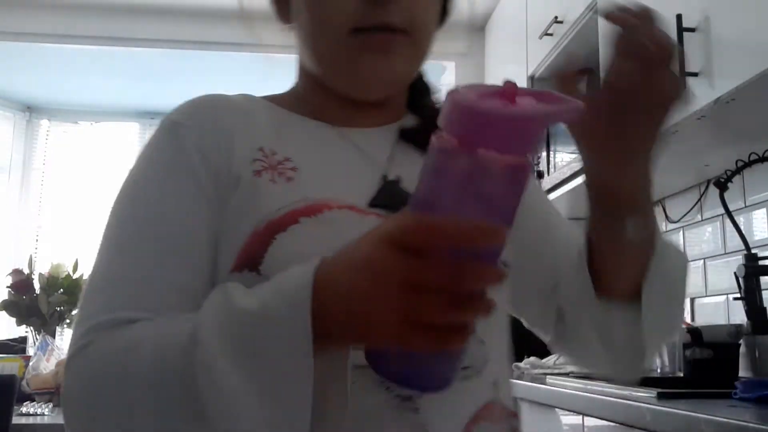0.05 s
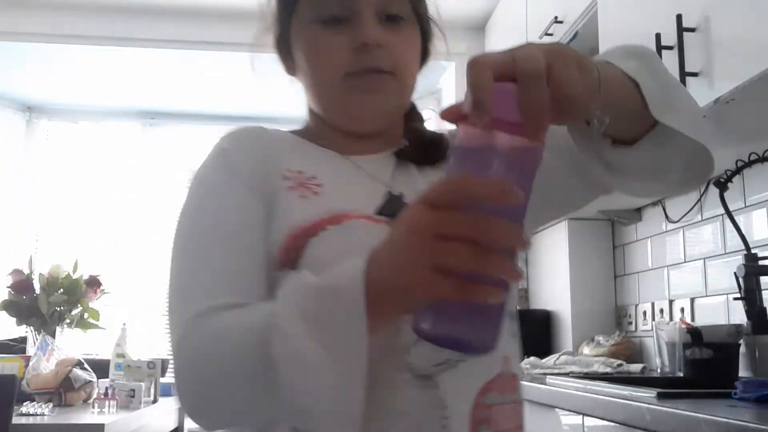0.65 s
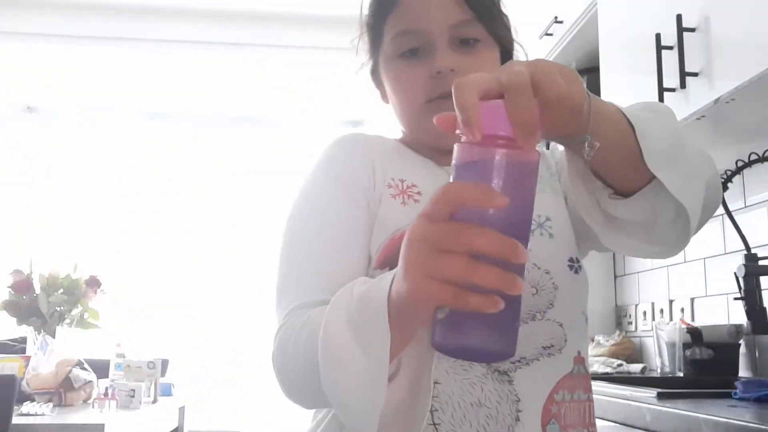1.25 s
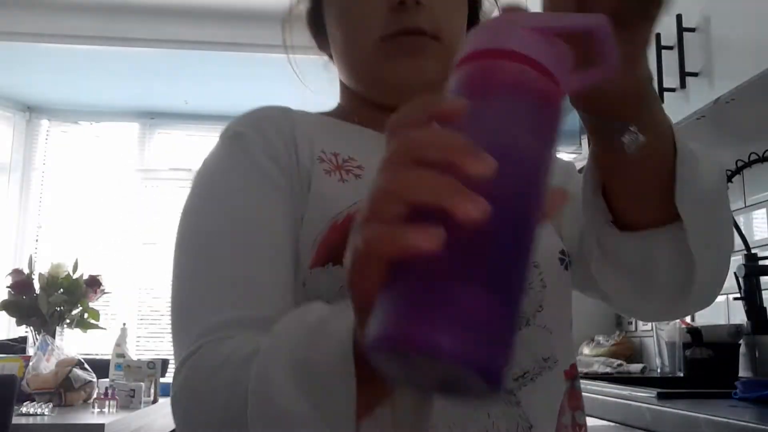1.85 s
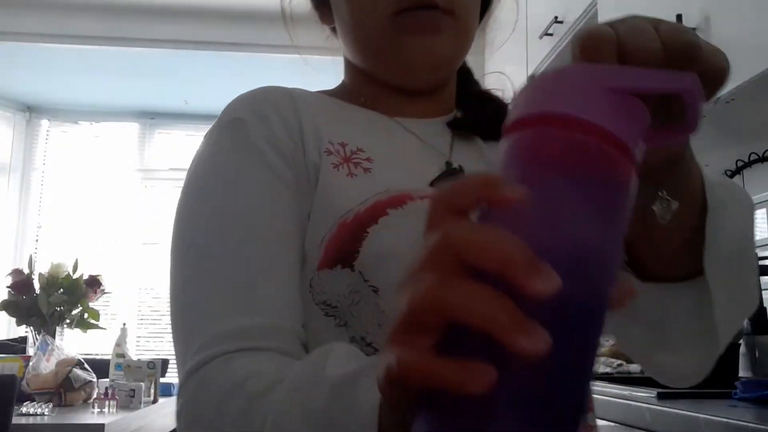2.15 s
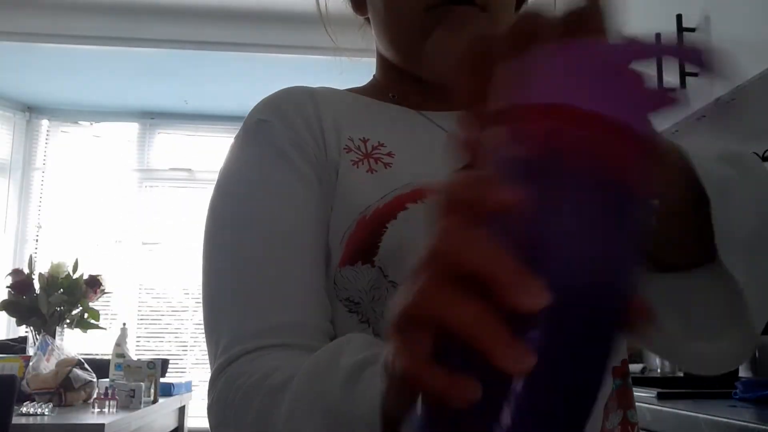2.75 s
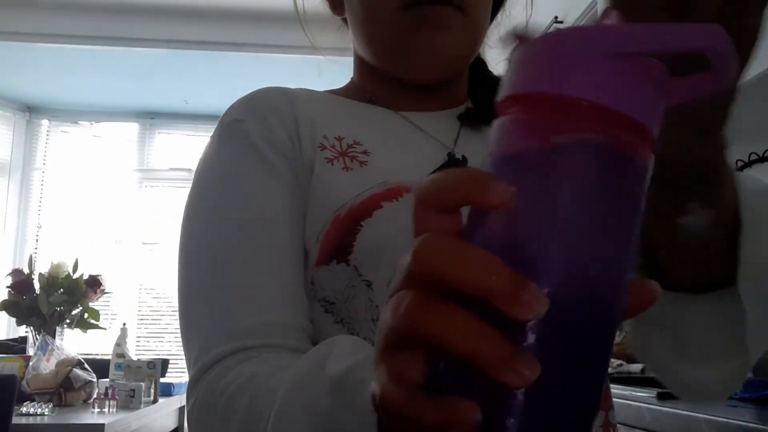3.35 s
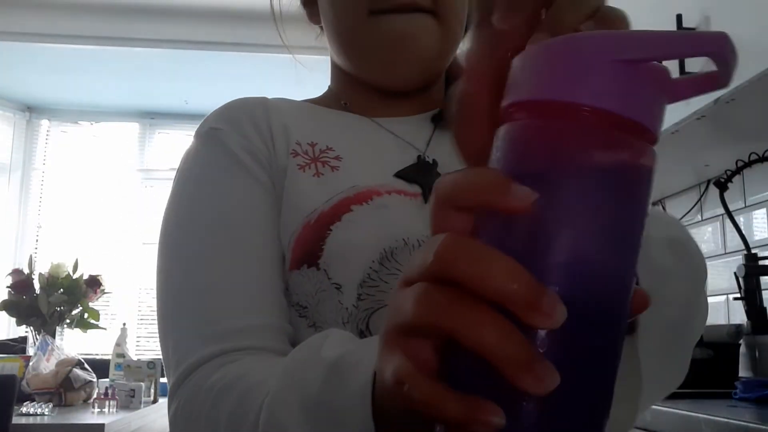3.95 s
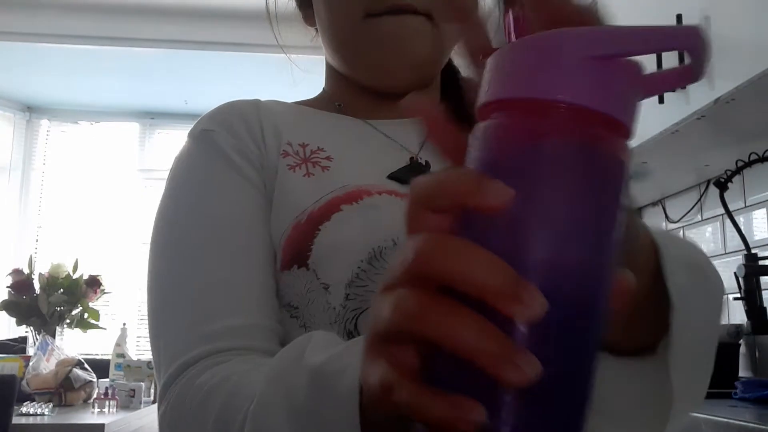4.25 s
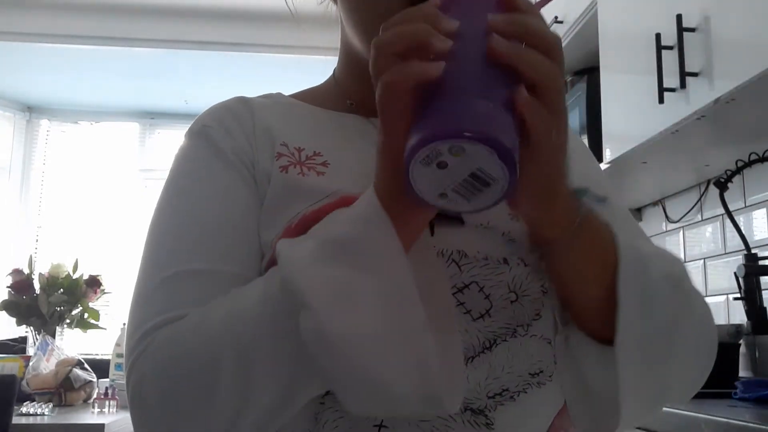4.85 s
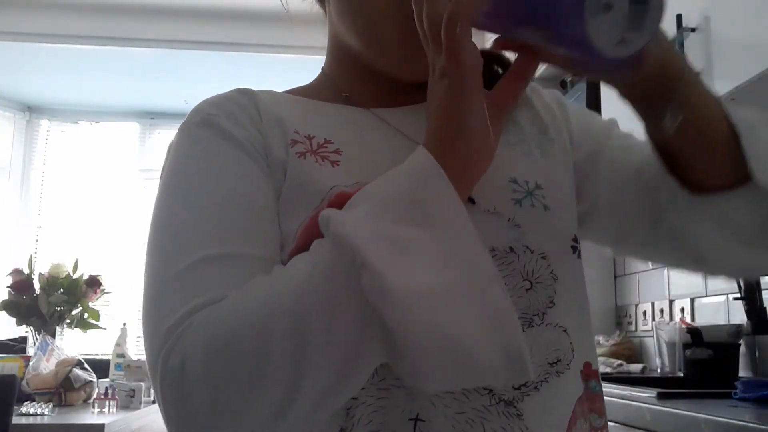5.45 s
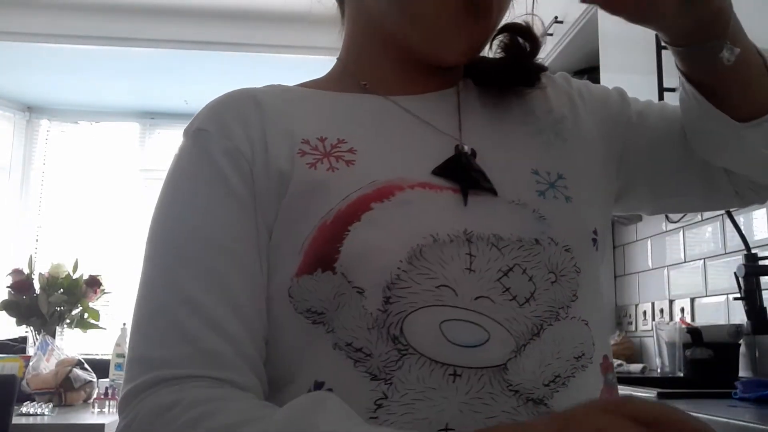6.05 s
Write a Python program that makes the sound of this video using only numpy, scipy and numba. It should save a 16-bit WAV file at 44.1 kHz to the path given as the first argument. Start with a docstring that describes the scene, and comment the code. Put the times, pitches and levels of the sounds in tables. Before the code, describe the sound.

In a quiet kitchen with a faint appliance hum, a plastic bottle is handled right by a small stereo microphone. Soft rubbing and scattered lid clicks lead to two loud, low thumps through the table, mixed with hollow knocks and clattering plastic. Then come small watery plips, a short snap of the flip straw and a soft slosh, before the handling dies away.

```python
"""A plastic water bottle with a flip straw, handled close to a small stereo microphone in a quiet kitchen.
Hands rub and the lid clicks, ringing the plastic; the hollow wall knocks and the spout snaps over.
The bottle bumps the table under the microphone, twice hard, and bubbles plip as the water is tipped.
An appliance hums behind it, tiled walls add a short tail, and the gain control ducks after big thumps."""
import sys
import numpy as np
from scipy import signal
from scipy.fft import rfft, irfft, next_fast_len
from scipy.io import wavfile
from scipy.ndimage import map_coordinates
from numba import njit

SR = 44100
rng = np.random.default_rng(int(sys.argv[2]) if len(sys.argv) > 2 else 0)


def pcm_store(signal):
    """Save signal as 16-bit PCM."""
    levels = np.round(np.clip(np.atleast_2d(signal), -1, 1) * 32767)
    wavfile.write(sys.argv[1], SR, levels.astype(np.int16).T)


N = 274294
TIME = np.arange(N) / SR
RING = np.arange(int(.7 * SR)) / SR  # seconds since the start of one event


def undb(db):
    """Decibels to gain."""
    return 10 ** (np.asarray(db) / 20)


def unit(x):
    """Scale to rms 1."""
    return x / np.sqrt(np.mean(x ** 2))


def fade(t60):
    """Exponential decay, 60 dB down after t60 seconds."""
    return np.exp(-np.log(1000) * RING / max(t60, 1e-3))


def add(out, s, sound):
    """Mix a sound in at s seconds."""
    i = max(int(s * SR), 0)
    out[..., i:i + sound.shape[-1]] += sound[..., :N - i]


def shaped(x, gain):
    """Filter by a gain that is a function of frequency."""
    size = next_fast_len(x.shape[-1])
    hz = np.maximum(np.arange(size // 2 + 1) * SR / size, 1)
    return irfft(rfft(x, size) * gain(hz), size)[..., :x.shape[-1]]


def resonate(x, peaks):
    """Parallel resonances, each applied twice for steep skirts."""
    out = 0
    for hz, width, db in peaks:
        b, a = signal.iirpeak(hz, hz / (1.5 * width), fs=SR)
        out = out + undb(db) * signal.lfilter(b, a, signal.lfilter(b, a, x))
    return out


def stereo_noise(size, spread=1):
    """Noise at the microphone's two ports: a shared part plus a part of their own."""
    return rng.standard_normal(size) + spread * rng.standard_normal((2, size))


def wander(rate_hz):
    """Random drift, spread near 1."""
    knots = rng.standard_normal(int(N / SR * rate_hz) + 2)
    return np.interp(TIME * rate_hz, np.arange(len(knots)), knots)


def struck(force, peaks):
    """Resonances rung by a force, rms 1 over the first 12 ms; grip and contact point shift them."""
    chance = rng.uniform(-1, 1, (len(peaks), 2))
    shifted = [(hz * (1 + .06 * detune), width, db + 2.5 * weight)
               for (hz, width, db), (detune, weight) in zip(peaks, chance)]
    ring = resonate(force, shifted)
    return ring / np.sqrt(np.mean(ring[:, :int(.012 * SR)] ** 2))


# An appliance in the background, centred. Each row: frequency in Hz, rms level in dB.
HUM_PARTIALS = [(49.2, -52), (98, -66.5), (147.4, -70), (196.5, -75.5), (294.8, -64), (393, -79)]


def appliance_hum():
    """A motor hums steadily on a few low partials."""
    return sum(np.sqrt(2) * undb(db) * np.sin(2 * np.pi * (hz * TIME + rng.random()))
               for hz, db in HUM_PARTIALS)


# Room tone all around the microphone. Each row: frequency in Hz, relative spectral density in dB.
AIR_SPECTRUM = [(25, -26.5), (60, -8), (120, 6.5), (250, -3), (450, -7), (700, -10), (1000, -19),
                (2000, -29), (4000, -35.5), (8000, -35), (11500, -33), (16000, -35.5)]


def room_tone(rms_db=-61.5, apart_hz=900):
    """Still air and microphone hiss, with the bass alike at both ports."""
    points_hz, db = np.transpose(AIR_SPECTRUM)
    colour = lambda hz: undb(np.interp(np.log(hz), np.log(points_hz), db))
    mid = shaped(rng.standard_normal(N), colour)
    side = shaped(rng.standard_normal(N), lambda hz: colour(hz) * hz / (hz + apart_hz))
    return undb(rms_db) * unit(np.array([mid + side, mid - side]))


# The bottle's resonances from close up: three ranges of the plastic, then the air and water inside.
# Each row: frequency in Hz, width in Hz, relative level in dB.
PLASTIC_BODY = [(660, 260, -4), (1200, 200, -8), (1450, 320, 1), (2150, 380, 0), (2550, 400, -3)]
PLASTIC_SNAP = [(3700, 1200, 0), (4800, 1400, 0), (6400, 1300, -5)]
PLASTIC_TOP = [(7850, 540, 5), (10360, 3000, 2.5), (13800, 2300, -12)]
CAVITY = [(367, 217, -0.5), (431, 45, -3.5), (637, 73, -3), (1207, 130, -8.5)]
# Hands and sleeves along the bottle, close to the microphone.
# Each row: middle in seconds, half length in seconds, relative level in dB.
HAND_STROKES = [(.01, 0.057, -51), (0.195, 0.044, -55), (0.43, .25, -67), (0.827, 0.054, -63),
                (1.22, .1, -73.5), (1.456, 0.029, -55.5), (1.787, 0.6, -72.5), (2.116, 0.089, -69.5),
                (2.743, 0.074, -58), (2.985, 0.14, -63), (3.69, 0.36, -63.5), (4.389, 0.094, -66),
                (4.9, 0.12, -63), (5.154, 0.037, -63), (5.284, 0.076, -68), (5.547, 0.054, -73),
                (6.184, 0.058, -87)]


def rubbing(thumps, firm_db=-56.5, hiss_growth=.87, catches_per_s=24):
    """Skin and cloth slide in tiny grains and catch, ringing the bottle; thumps shake the grip too."""
    strokes = sum(undb(db) * np.exp(-((TIME - s) / half_s) ** 2) for s, half_s, db in HAND_STROKES)
    shake = follow(np.abs(thumps[0]), attack_s=.004, release_s=.03)
    rub = strokes + undb(-43) * shake
    hiss = undb(-62) * (rub / undb(firm_db)) ** hiss_growth  # light strokes are airier
    catches = (rng.random(N) < catches_per_s / SR) * rng.uniform(1, 3.3, N)
    grip = 1 + signal.fftconvolve(catches, fade(.025))[:N]
    slips = stereo_noise(N, spread=3.4) * grip * undb(2 * wander(70) + 3 * wander(700))
    low = unit(resonate(slips, PLASTIC_BODY)) + undb(-6) * unit(resonate(slips, CAVITY))
    high = unit(resonate(slips, PLASTIC_SNAP)) + undb(-8) * unit(resonate(slips, PLASTIC_TOP))
    return undb(-1) * rub * low + hiss * high


# Lid, straw and fingernails, close up. Each row: start in seconds, level in dB,
# brightness in dB added from one range of the plastic to the next.
LID_CLICKS = [(.031, -44, -2.5), (0.326, -59.5, -17), (0.387, -55.5, -17), (.452, -48.5, -2.5),
              (.540, -54, -9), (0.563, -56, -4.5), (0.749, -59, -8), (1.429, -58, -19), (2.230, -40, -1.5),
              (2.299, -40, -16), (2.338, -46, -4), (2.756, -46.5, -2), (2.772, -47, 3), (2.819, -41.5, -12),
              (2.847, -37, -6.5), (2.8826, -30, -3.5), (2.919, -34.5, 2), (2.982, -41.5, -11),
              (3.004, -45.5, -19), (3.024, -36.5, 0), (3.106, -44.5, -4), (3.203, -50, -6.5),
              (3.316, -55, -17), (3.416, -51.5, -17), (3.547, -54, 4), (3.663, -58.5, -12), (3.854, -59, 5),
              (3.999, -58, -15), (4.015, -55, -3), (4.322, -48.5, -6.5), (4.3765, -48.5, -7.5),
              (4.902, -62, 3.5)]


def clicks(crack_t60=.0034, rattle_t60=.063, size=6000):
    """A sharp crack and a short, uneven rattle ring the plastic; hard contacts reach higher."""
    out = np.zeros((2, N))
    ranges = (PLASTIC_BODY, 0), (PLASTIC_SNAP, -1), (PLASTIC_TOP, -6)
    crack = 1.56 * fade(crack_t60)[:size]
    for s, db, bright_db in LID_CLICKS:
        chatter = undb(4 * np.repeat(rng.standard_normal(size // 60), 60) - 2)
        force = stereo_noise(size) * (crack + chatter * fade(rattle_t60)[:size])
        for k, (peaks, range_db) in enumerate(ranges):
            add(out, s, undb(db + range_db + k * bright_db) * struck(force, peaks))
    return out


# Knocks on the bottle's wall, close up. Each row: start in seconds, level in dB.
WALL_KNOCKS = [(0.032, -55.5), (2.232, -23), (2.848, -28), (2.881, -24), (2.920, -28.5)]


def knocks(t60=.06):
    """A blow makes the whole bottle sound, brief and hollow."""
    out = np.zeros((2, N))
    for s, db in WALL_KNOCKS:
        force = stereo_noise(len(RING), spread=.53) * fade(t60)
        add(out, s, undb(db) * struck(force, CAVITY))
    return out


# Bubbles and drops inside bottle and straw. Each row: start in seconds, starting pitch in Hz, level in dB.
BUBBLES = [(.852, 710, -50.5), (3.78, 2470, -47.5), (3.854, 444, -33.5), (3.9095, 537, -29.5),
           (3.917, 2270, -43.5), (3.923, 405, -36), (3.947, 2530, -48.5), (4.047, 1470, -44),
           (4.086, 2136, -42.5), (6.095, 2340, -56.5)]


def plips(attack_s=.00077, t60=.032, octaves_per_s=2.1):
    """Each bubble is a short, rising ring whose pitch trembles as its shape changes."""
    out = np.zeros(N)
    envelope = (1 - np.exp(-RING / attack_s)) * fade(t60)
    glide = octaves_per_s * np.minimum(RING, t60)
    for s, hz, db in BUBBLES:
        tremble = .03 * wander(900)[:len(RING)]
        phase = 2 * np.pi * np.cumsum(hz * 2 ** (glide + tremble)) / SR
        add(out, s, undb(db) * envelope * np.sin(phase))
    return out


# The table the microphone stands on. Each row: mode frequency in Hz, relative level in dB, t60 in seconds.
TABLE_MODES = [(66.8, -14.5, 0.17), (87.5, -8.5, 0.27), (103.9, -11.5, 0.42), (129.8, -10, 0.18),
               (175.46, 0.5, 0.25), (195.7, 13, 0.02), (229, -16, 0.36), (324, -24.5, 0.34),
               (378, -33, 0.38), (416.6, -23.5, 0.16), (459, -34, 0.3), (630, -32, 0.16)]
# Bumps that reach the microphone through the table.
# Each row: start in seconds, relative level in dB, contact hardness as a corner frequency in Hz.
TABLE_BUMPS = [(2.229, 6, 900), (2.301, -5.5, 400), (2.557, -35.5, 200), (2.656, -31, 190),
               (2.764, -24.5, 220), (2.847, 0, 910), (2.918, -17, 1500), (3.015, -33, 200),
               (3.493, -13.5, 86), (3.548, -25.5, 136), (3.859, -28, 107), (4.008, -37.5, 121),
               (5.01, -35.5, 97), (5.876, -31, 113), (6.169, -36.5, 111)]


def table_thumps(swell_cycles=.99, apart_hz=520, most_apart_rad=.44):
    """The table's modes swell over a cycle or two; a soft contact reaches only the low ones."""
    out = np.zeros((2, N))
    for s, db, corner_hz in TABLE_BUMPS:
        detunes = 1 + .006 * rng.standard_normal(len(TABLE_MODES))
        for k, (hz, mode_db, t60) in enumerate(TABLE_MODES):
            swell = 1 - np.exp(-(RING * hz / swell_cycles) ** 2)
            contact = 1 / np.sqrt(1 + (hz / corner_hz) ** 6)
            # shorter waves reach the two ports out of step
            apart = np.array([[1], [-1]]) * min((hz / apart_hz) ** 2, most_apart_rad)
            wave = (-1) ** k * np.sin(2 * np.pi * hz * detunes[k] * RING + apart)
            add(out, s, undb(db + mode_db) * contact * swell * fade(t60) * wave)
    return out


# The spout flips and rebounds near the microphone. Each row: start in seconds, level in dB.
SPOUT_FLIPS = [(4.458, -41), (4.494, -55)]
# The spout's resonances. Each row: frequency in Hz, width in Hz, relative level in dB.
SPOUT_PEAKS = [(1480, 234, 5.5), (2290, 510, 5.5), (2810, 500, -1.5), (4600, 680, -16.5)]


def spout(t60=.026):
    """The stiff spout snaps over its catch with a short, hard crack."""
    out = np.zeros((2, N))
    for s, db in SPOUT_FLIPS:
        force = stereo_noise(len(RING)) * fade(t60)
        add(out, s, undb(db) * struck(force, SPOUT_PEAKS))
    return out


def slosh(middle_s=4.96, spread_s=.08, db=-58, count=70):
    """As the bottle is tipped, a swarm of small, quickly damped bubbles rises through the water."""
    out = np.zeros(N)
    for when, pitch, strength in rng.standard_normal((count, 3)):
        hz = 470 * 2 ** (.55 * pitch)
        bubble = np.sin(2 * np.pi * hz * RING * (1 + RING)) * fade(12 / hz)
        add(out, middle_s + spread_s * when, undb(db + 2 * strength) * bubble)
    return out


def kitchen_reverb(x, low_t60=.45, treble_t60=.23, split_hz=4000, build_s=.0098):
    """Tiled walls return a diffuse tail, different at each port and shorter in the treble."""
    noise = rng.standard_normal((2, len(RING)))
    low = shaped(noise, lambda hz: 1 / (1 + (hz / split_hz) ** 2))
    tail = low * fade(low_t60) + (noise - low) * fade(treble_t60)
    tail *= 1 - np.exp(-(RING / build_s) ** 2)
    tail /= np.sqrt(np.sum(tail ** 2) / 2)
    return signal.fftconvolve(x[None], tail, axes=1)[:, :N]


# The bottle's place before the microphone. Each row: time in seconds, lag of the right port in samples.
BOTTLE_PATH = [(0, 6), (1.8, 0), (2.7, 9.5), (3.0, 1), (3.7, -4), (4.1, 7.5), (6.2, 5.5)]


def placed(bottle):
    """As the bottle moves, its sound reaches the right port a little later or earlier than the left."""
    left, right = bottle
    lag = np.interp(TIME, *np.transpose(BOTTLE_PATH))
    return np.array([left, map_coordinates(right, [np.arange(N) - lag], order=3)])


def scene():
    """The bottle reaches the microphone through the air, the thumps mostly through the table."""
    thumps = table_thumps()
    plastic = clicks() + spout() + rubbing(thumps)
    hollow = knocks() + plips() + slosh()
    to_walls = undb(-7.5) * plastic + undb(-10) * hollow + undb(-28) * thumps
    room = kitchen_reverb(to_walls.mean(axis=0))
    table = thumps * undb([[.5], [-.5]])  # slightly left
    return placed(plastic + hollow) + table + room + appliance_hum() + room_tone()


@njit
def follow(x, attack_s, release_s):
    """Level follower that rises fast and sinks slowly."""
    out, level = np.empty(len(x)), 0.
    for i in range(len(x)):
        level += (x[i] - level) / (SR * (attack_s if x[i] > level else release_s))
        out[i] = level
    return out


def record(dry):
    """Gain control ducks after loud thumps and recovers over a second; the top is cut."""
    threshold_db, ratio, top_hz = -30, 1.35, 15900
    level = follow(np.abs(dry).max(axis=0), attack_s=.005, release_s=.33)
    gain = np.maximum(level / undb(threshold_db), 1) ** (1 / ratio - 1)
    lowpass = signal.ellip(10, .2, 80, top_hz, fs=SR, output="sos")
    return signal.sosfilt(lowpass, dry * gain)


dry = scene()
out = record(dry)
pcm_store(out)
```